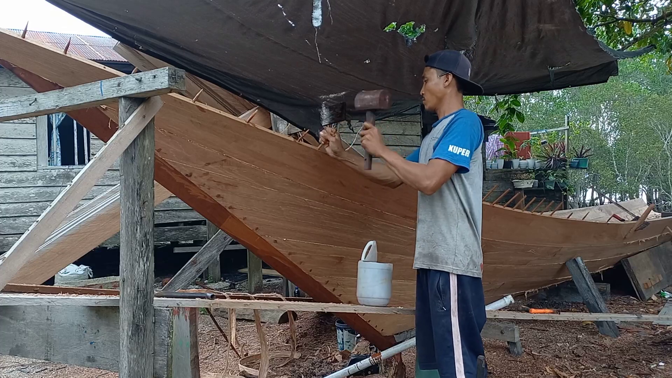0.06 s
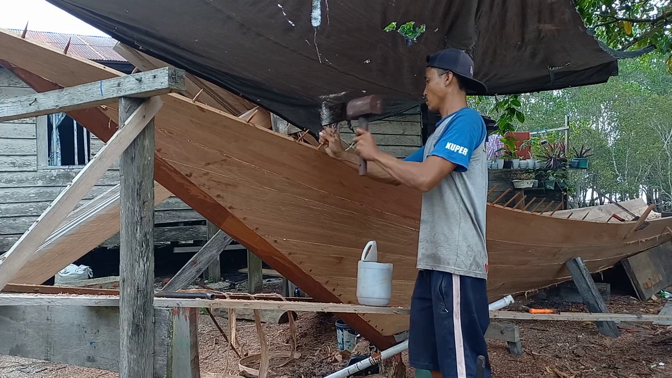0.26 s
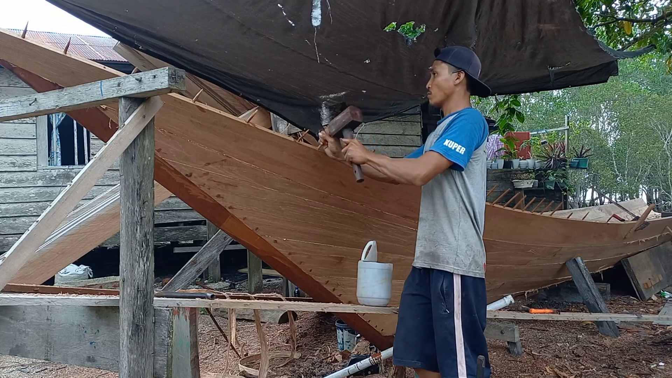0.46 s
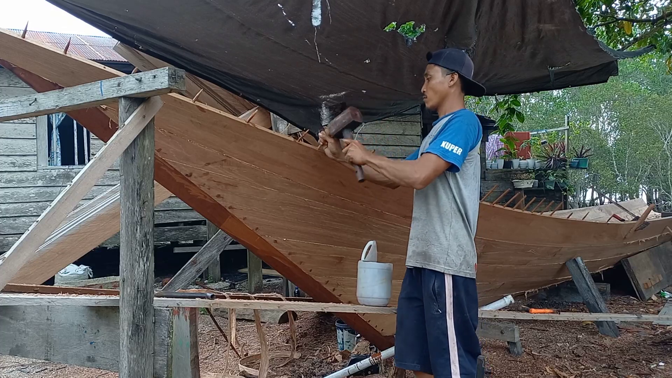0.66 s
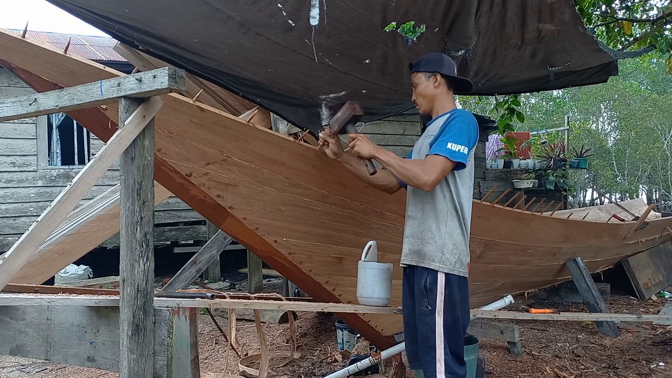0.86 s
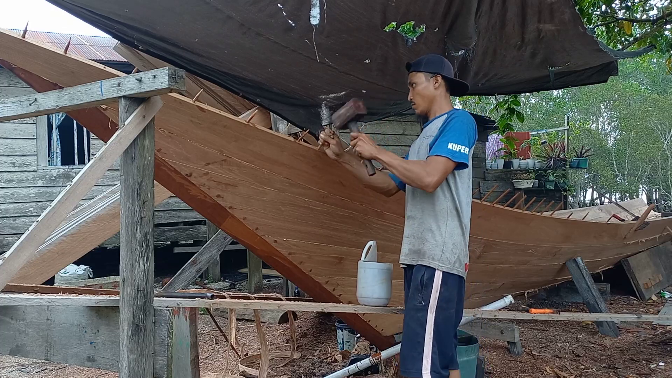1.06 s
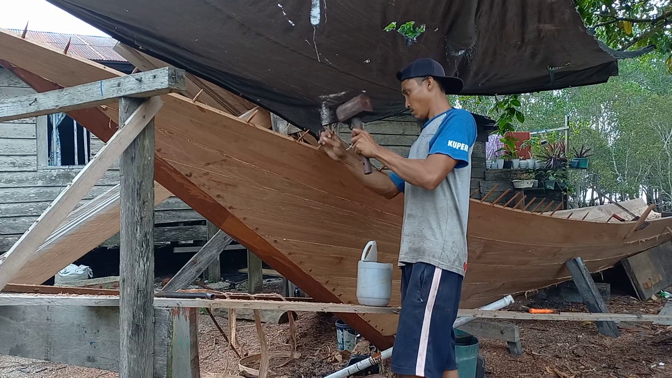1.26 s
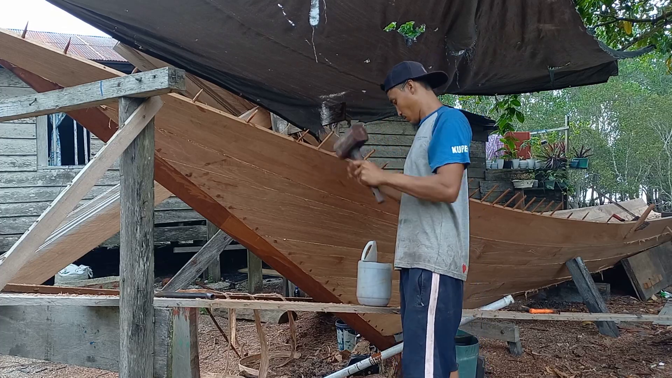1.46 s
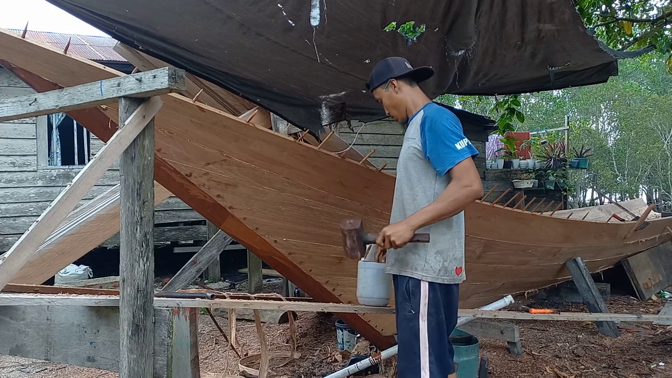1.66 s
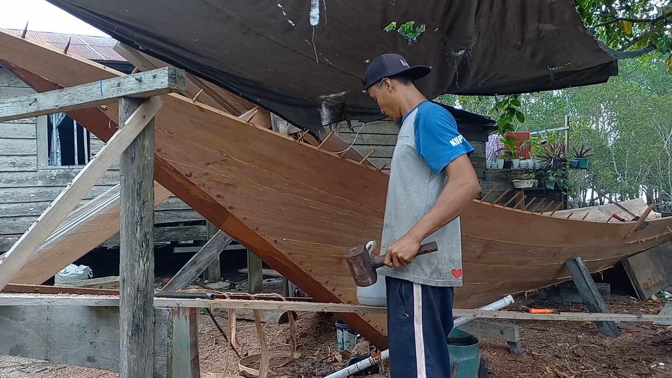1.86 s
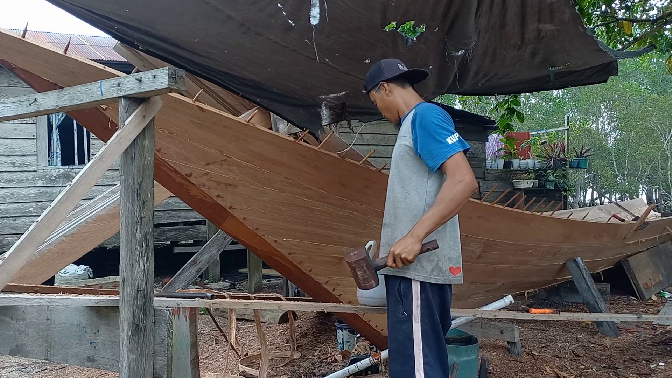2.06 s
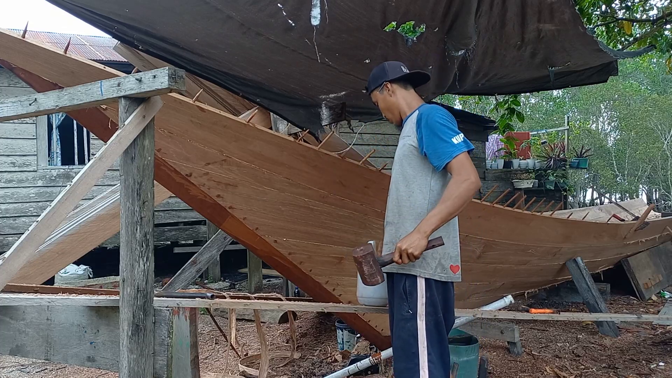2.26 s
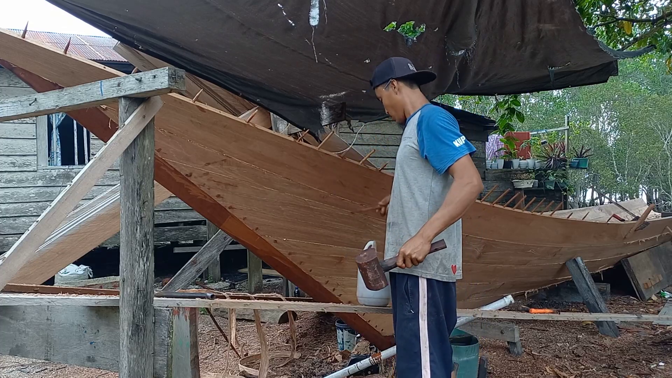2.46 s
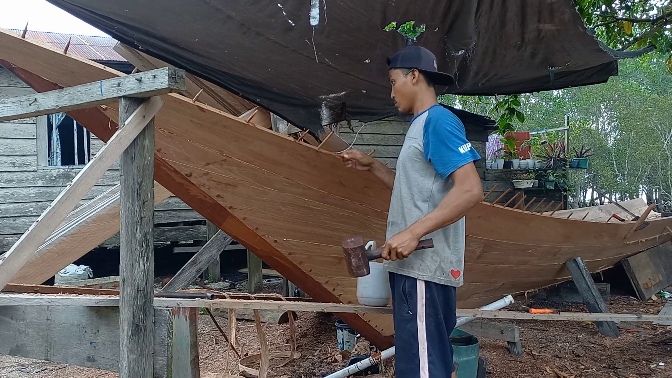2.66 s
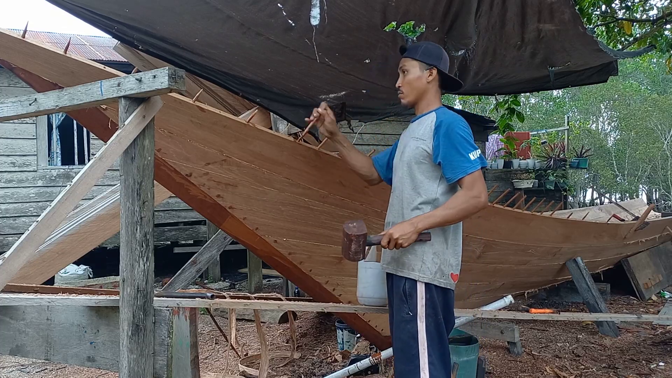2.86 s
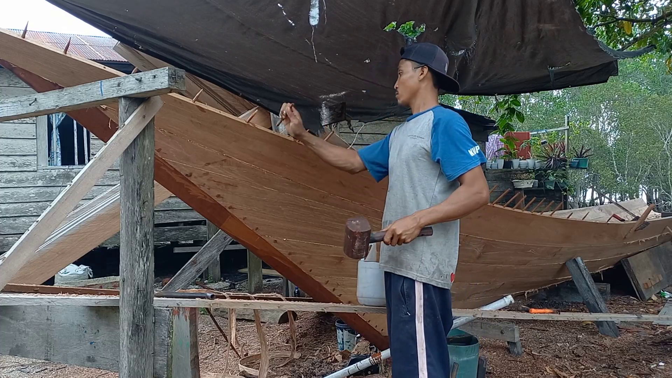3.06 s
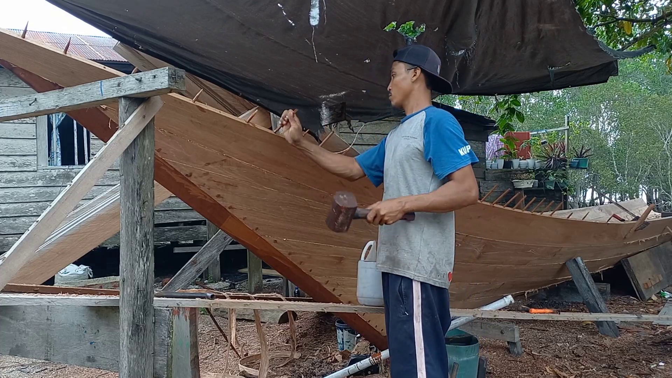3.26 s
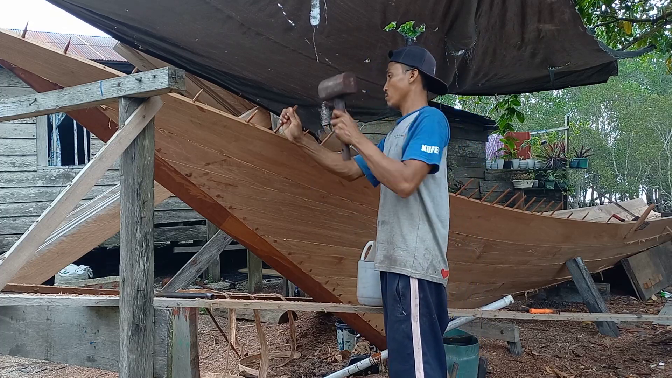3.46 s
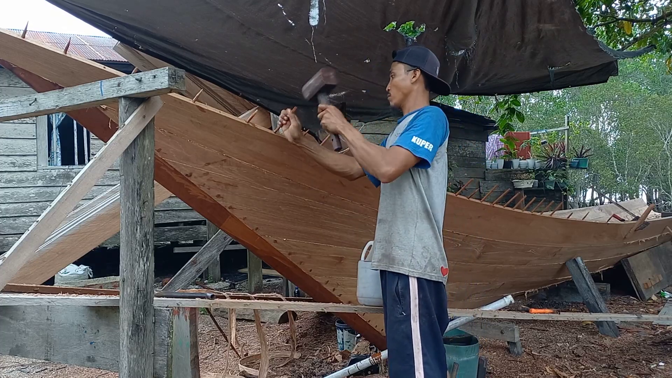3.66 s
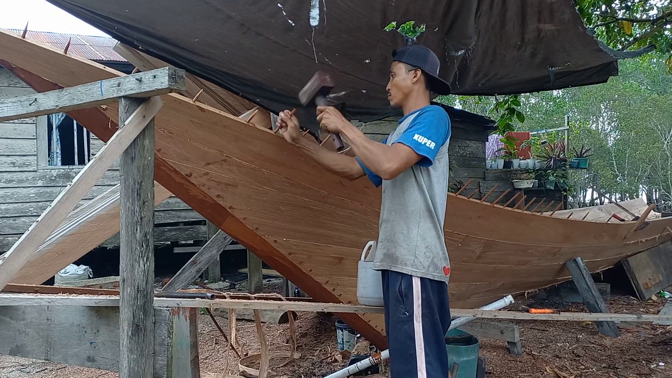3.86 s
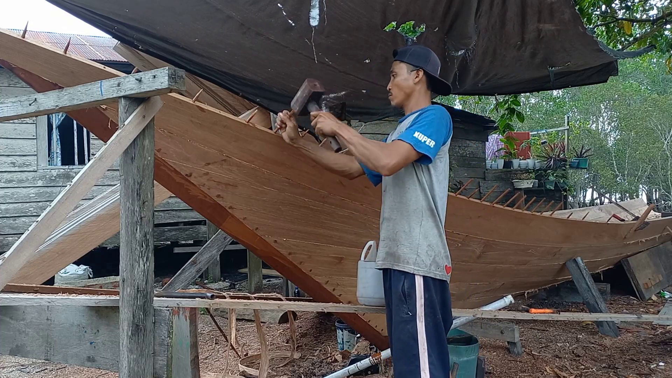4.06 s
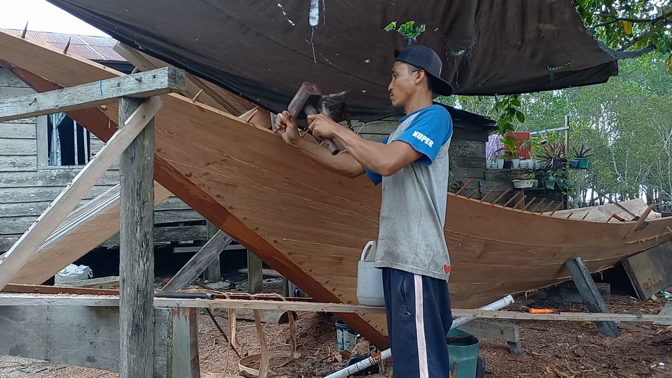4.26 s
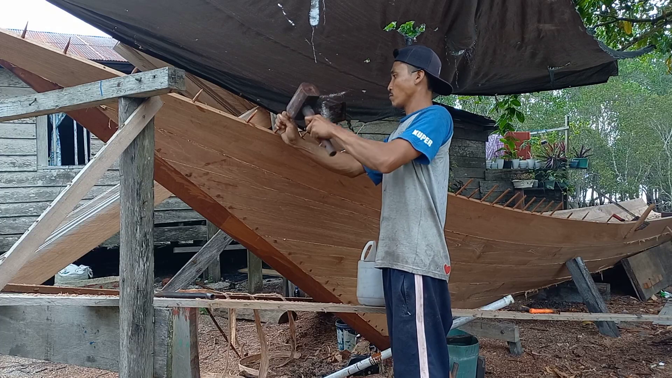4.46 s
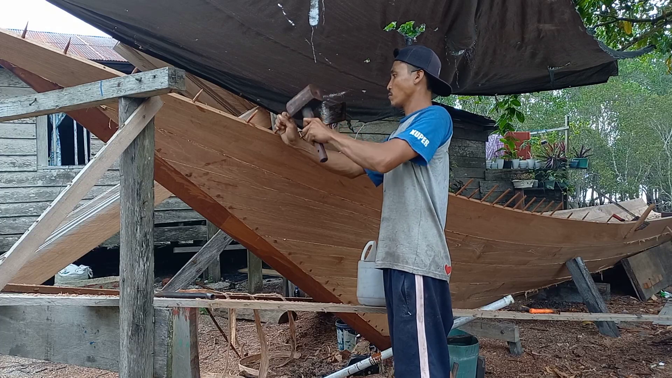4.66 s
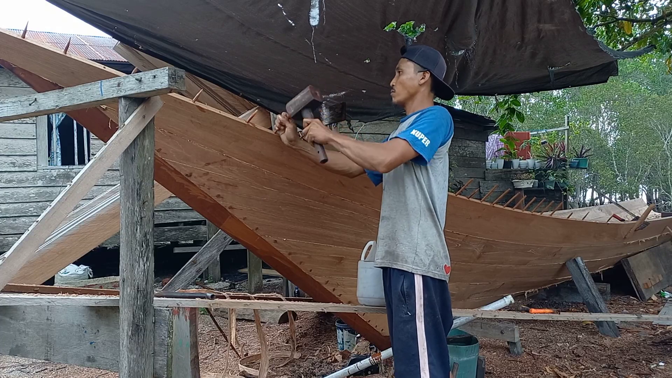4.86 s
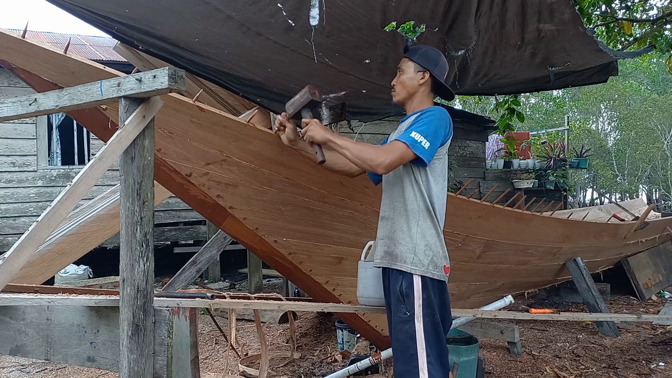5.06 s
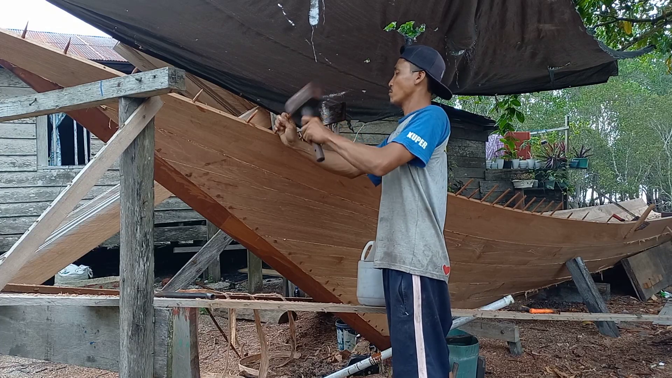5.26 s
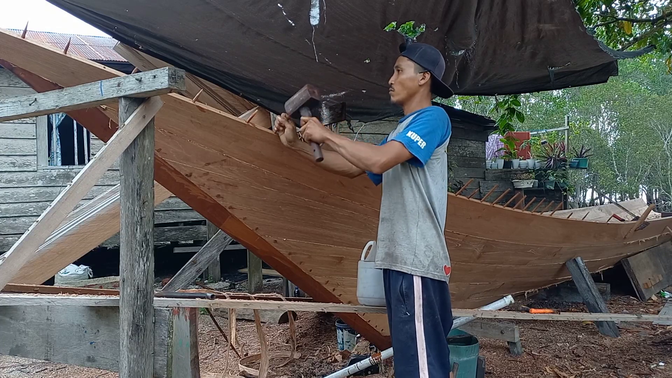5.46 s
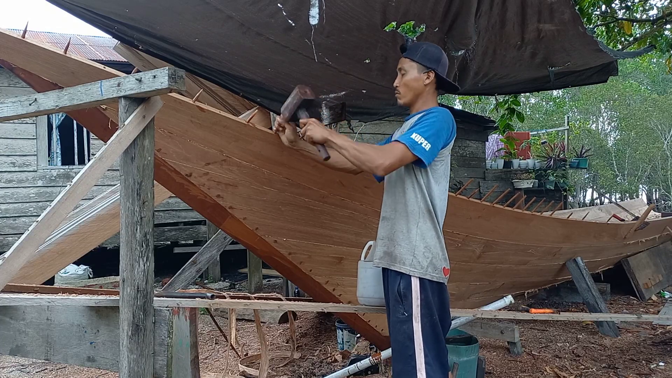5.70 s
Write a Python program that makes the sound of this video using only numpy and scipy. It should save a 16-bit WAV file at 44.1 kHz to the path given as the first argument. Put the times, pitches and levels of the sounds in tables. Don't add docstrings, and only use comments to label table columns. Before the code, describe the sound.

Quick, steady hammer blows crack and ring on hull planks, pause for rummaging and bird calls, then resume as a motorbike pulls off.

```python
import sys
import numpy as np
from scipy import signal
from scipy.fft import rfft, irfft
from scipy.io import wavfile
from scipy.ndimage import uniform_filter1d

SR = 44100
rng = np.random.default_rng(int(sys.argv[2]) if len(sys.argv) > 2 else 0)


def bounce(signal):
    frames = np.transpose(np.atleast_2d(signal))
    limited = np.clip(frames, -1, 1)
    pcm = np.round(limited * 32767).astype(np.int16)
    wavfile.write(sys.argv[1], SR, pcm)


def attenuation_scalar(level_db):
    decades = np.asarray(level_db, float) / 20
    return 10 ** decades


N = 252690


def curve(table):
    s, *columns = np.transpose(table)
    return [np.interp(np.arange(N) / SR, s, c) for c in columns]


def unit(x):
    return x / np.sqrt(np.mean(x ** 2))


def band(x, hz, octaves):
    edges = np.clip(hz * 2 ** (np.array([-octaves, octaves]) / 2), 10, .47 * SR)
    return signal.sosfilt(signal.butter(2, edges, "band", fs=SR, output="sos"), x)


def highpass(x, order, hz):
    return signal.sosfilt(signal.butter(order, hz, "high", fs=SR, output="sos"), x)


def walk(rate):
    k = int(SR / rate)
    steps = np.repeat(rng.standard_normal(N // k + 1), k)
    return unit(uniform_filter1d(uniform_filter1d(steps, k), k)[:N])


def pair(mid, side, alike):
    alike = np.clip(alike, 0, 1)
    shared = mid * np.sqrt((1 + alike) / 2)
    opposed = side * np.sqrt((1 - alike) / 2)
    return np.array([[1], [1]]) * shared + np.array([[1], [-1]]) * opposed


def noise_pair(n, alike):
    return pair(*rng.standard_normal((2, n)), alike)


def place(x, left_lead, pan_db):
    x = x * np.ones((2, 1))
    turn = np.exp(1j * np.pi * np.fft.rfftfreq(N) * left_lead * np.array([[1], [-1]]))
    return irfft(rfft(x) * turn, N) * attenuation_scalar(np.array([[pan_db], [-pan_db]]) / 2)


def add(out, s, sound):
    i = int(s * SR)
    out[..., i:i + sound.shape[-1]] += sound[..., :N - i]


def fade(t, t60):
    return np.exp(-np.log(1000) * t / t60)


# pitch_hz, level_db (per Hz)
YARD = [(30, -32.5), (80, -33.5), (105, -7), (200, 10), (400, -24), (700, -19), (1200, -41), (2200, -16.5),
        (3600, -28), (5500, -22), (8500, -26.5), (12000, -24), (13500, -26), (15500, -23.5)]
# start_s, end_s, level_db
INSECTS = [
    (0, 1.5, -63),
    (2.25, 2.6, -62.5),
    (2.85, 3.42, -60),
    (3.54, 5.73, -61.5),
]
YARD_DB, YARD_ALIKE_HZ = -53.5, 709
INSECT_REST_DB, INSECT_EDGE_S, CRICKETS_DB = -69, .12, -68
LULL_S, LULL_DB, LULL_EDGE_S = (1.72, 2.3), -3.5, .2


def yard():
    t = np.arange(N) / SR
    lull = 1. * ((t > LULL_S[0]) & (t < LULL_S[1]))
    lull_db = LULL_DB * uniform_filter1d(lull, int(LULL_EDGE_S * SR))
    yard_hz, yard_level_db = np.transpose(YARD)
    hum, swell = 0, walk(0.16)
    for hz in 30 * 2 ** np.arange(0, 9.2, 1 / 2):
        db = np.interp(np.log(hz), np.log(yard_hz), yard_level_db)
        db = db + lull_db * (hz > 900) + 0.14 * swell + 0.17 * walk(8)
        alike = 1 / (1 + (hz / YARD_ALIKE_HZ) ** 2) + 0.065
        hum = hum + attenuation_scalar(db) * band(noise_pair(N, alike), hz, 1 / 2)
    hiss = noise_pair(N, 0.068)
    bouts = sum((db - INSECT_REST_DB) * ((t >= start) & (t < end)) for start, end, db in INSECTS)
    swell_db = INSECT_REST_DB + uniform_filter1d(bouts, int(INSECT_EDGE_S * SR))
    insects = unit(band(band(hiss, 10200, .5), 10200, .5)) * attenuation_scalar(swell_db + 1.2 * walk(40))
    crickets = unit(band(band(hiss, 12300, 0.09), 12300, 0.09)) * attenuation_scalar(CRICKETS_DB)
    return place(attenuation_scalar(YARD_DB) * unit(hum) + insects + crickets, 11.3, -.6)


DULL_HZ = 350


def engine(hz, pipe, stretch, jitter, wobble_db, dull_db=0):
    turns = np.cumsum(hz * (1 + jitter * walk(30))) / SR
    note, power = 0, 0
    for k in range(2, 14):
        gain = 0
        for centre_hz, width_hz, db in pipe:
            detune = 2 * (k * hz / stretch - centre_hz) / width_hz
            gain = gain + attenuation_scalar(db) / (1 + detune ** 2) ** 2
        gain = gain * attenuation_scalar(dull_db * (k * hz > DULL_HZ))
        harmonic = np.sin(2 * np.pi * (k * turns + rng.random()))
        note = note + gain * attenuation_scalar(wobble_db * walk(26.015)) * harmonic
        power = power + gain ** 2 / 2
    return note / power ** 0.37, turns % 1


# time_s, firing_hz, level_db
BIKE = [(0, 57.3, -45.5), (1.2, 54.42, -55.5), (1.9, 49.98, -54.5), (2.3, 46.1, -49.5), (2.62, 35.1, -57),
        (2.88, 40.3, -45.5), (2.98, 49.13, -39.5), (3.19, 82.9, -36.5), (3.3, 94.2, -32),
        (3.42, 99.94, -38), (3.55, 90.1, -36), (3.63, 76.74, -45), (3.85, 48.04, -45), (4, 44.25, -48),
        (4.66, 59.42, -46.5), (5.1, 76.06, -39.5), (5.4, 88.75, -46.5), (5.73, 93.3, -43)]
# pitch_hz, width_hz, level_db
EXHAUST = [(190.6, 81, 1), (255.5, 59, -12), (378, 70, -19.5), (441, 72, -13), (680, 70, -28),
           (800, 80, -30), (990, 120, -31)]
RASP_DB, RASP_PER_NOTE, RASP_DB_PER_OCTAVE = -56.5, 0.6, 4.5
PIPE_STRETCH, PULL_S, HEAT_PER_S = 1.046, 4.08, 0.093
DULL_DB_PER_S = -6


def motorbike():
    hz, db = curve(BIKE)
    pulling_s = np.maximum(np.arange(N) / SR - PULL_S, 0)
    stretch = PIPE_STRETCH + HEAT_PER_S * pulling_s
    note, phase = engine(hz, EXHAUST, stretch, .009, 3.2, DULL_DB_PER_S * pulling_s)
    rasp_db = RASP_DB + RASP_PER_NOTE * (db + 45) + RASP_DB_PER_OCTAVE * np.log2(hz / 55)
    gas = noise_pair(N, 0.66) * (1.0 + np.exp(-phase / 0.59))
    return place(attenuation_scalar(db) * note + attenuation_scalar(rasp_db) * unit(band(gas, 345, 2.46)), 12.3, 0)


# time_s, firing_hz, level_db
IDLER = [
    (0, 50.14, -48.5),
    (2.0, 52.4, -58),
    (2.45, 55.1, -60),
    (2.7, 51.9, -70),
    (5.73, 52.3, -81),
]
# pitch_hz, width_hz, level_db
IDLER_PIPE = [(105, 40, -8), (260, 16, -3), (333, 122, 0.5), (376.5, 21, -2), (457, 67, -18)]


def far_engine():
    hz, db = curve(IDLER)
    note, _ = engine(hz, IDLER_PIPE, 0.96, 0.0019, 3.4)
    return place(attenuation_scalar(db) * note, 10.0, 0)


# start_s, crack_peak_db, plank_ring_db, slap_s (plank on its rib), slap_peak_db
BLOWS = [(0.092, -23, -26, .1084, -18.5), (0.2754, -21, -24.5, .2917, -17.5),
         (0.451, -20.5, -26.5, .4717, -17), (0.623, -20, -23.5, .6389, -15.5),
         (0.799, -20, -19.5, .8272, -20.5), (0.969, -19, -20, .9864, -16.5),
         (1.1422, -18, -21, 1.1603, -15.5), (1.3186, -17.5, -17, 1.3393, -16),
         (1.4836, -19.5, -15, 1.5201, -14), (3.7358, -29.5, -23, 3.7522, -36),
         (3.952, -25, -26, 3.9695, -27), (4.168, -22.5, -26, 4.1845, -22), (4.378, -22, -26, 4.394, -17.5),
         (4.5993, -21.5, -24.5, 4.6241, -22), (4.812, -21.5, -23.5, 4.8397, -18.5),
         (5.0193, -20, -26.5, 5.045, -18), (5.2273, -21, -22, 5.2528, -14.5),
         (5.429, -22, -24, 5.4552, -15), (5.6353, -20.5, -22.5, 5.6606, -16)]
FIRST_PEG = 9
HAMMER_LEAD = 2.3
TREBLE_DB, DULLING_DB = (-10, -7.5), (1.36, 1.5)
LATE_RING_DB, LATE_RING_PER_SLAP = (-4.5, -3.5), 0.62
THUMP_DB, THUMP_PER_RING = (-30, -32), 0.22


def peg_of(k):
    return int(k >= FIRST_PEG)


def colour(k):
    s, crack_db, plank_db, slap_s, slap_db = BLOWS[k]
    peg = peg_of(k)
    treble_db = crack_db + TREBLE_DB[peg] - DULLING_DB[peg] * (k - peg * FIRST_PEG)
    late_ring_db = LATE_RING_DB[peg] + LATE_RING_PER_SLAP * (slap_db - plank_db)
    thump_db = THUMP_DB[peg] + THUMP_PER_RING * (plank_db + 34.5)
    return treble_db, late_ring_db, thump_db


# pitch_hz, crack_db, crack_t60_s, ring_db, rise_s, hold_s, ring_t60_s,
# left_right_likeness (0-1)
HULL = [(142.5, -19.5, 0.034, -14, 0.0038, 0.022, 0.24, 0.99),
        (230.3, -21, 0.063, -12, 0.0022, 0.04, 0.39, 0.97), (551, -7, 0.006, -13, 0.008, 0.031, 0.19, 0.9),
        (900, -12, 0.014, -9, 0.014, 0.019, 0.15, 0.53), (1700, -12, 0.12, -16, 0.006, 0.007, 0.12, 0.4),
        (2935, -15.5, 0.091, -20, 0.004, 0.0098, 0.27, 0),
        (4700, -3.5, 0.011, -21, 0.0066, 0.034, 0.16, 0.1),
        (6570, 2, 0.033, -19.5, 0.00084, 0.024, 0.35, 0.26),
        (11400, -6, 0.065, -11.5, 0.00082, 0.04, 0.22, 0),
        (13600, 12.5, 0.0051, -30, 0.0022, 0.02, 0.16, 0.6)]
# ring_time (share of the usual), sparkle_db, thump_db
LANDING = [(0.95, -7, 0.5), (0.9, -6.5, -1), (1.02, -3.5, -2), (0.93, -2.5, -2.5), (0.83, -2, 2),
           (0.94, 0.5, 0), (0.93, 1.5, 0), (0.91, 2, 0), (0.85, 3.5, .5), (0.78, -11, 2), (1.13, -1.5, 1.5),
           (0.98, -5, -1), (0.99, -4, -1.5), (0.99, -2, 4), (0.82, 2, 0.5), (1.03, 5, -2.5), (0.9, 8, -2.5),
           (1.03, 8.5, -4.5), (.97, 9, 3)]
# low_body_db, upper_body_db, steel_click_db (over the crack), wall_echo_db
TONE = [(1.5, -1, 5, -1), (0, 0, 6, -1), (0.5, 0, 5, -1), (0, 0, 3, -1), (-0.5, 0.5, 6, 0), (-1, 0, 4, 0),
        (0, 0, 7, -1), (-0.5, 0.5, 8, -1), (-1.5, 0, 2.5, 0), (1.5, -0.5, 0.5, -3), (0, -1, -1, -1),
        (-1, -0.5, 3, 0.5), (-1.5, -0.5, 1.5, 1), (-1, -1, -0.5, 2), (-2, -0.5, -3, 2), (1, -0.5, 1.5, 0.5),
        (-1, -0.5, -1, 1), (0, -0.5, 4, 2.5), (-1, 0.5, 5, 2.5)]
SPLASH_DB = [0, 0.3, -0.8, -0.1, 3, -0.3, -1, -.6, 1.5, -10, 0.7, 0.5, -0.5, 2.5, 0.8, -0.5, 1, 0.5, 0]
SPIKE = (0.95, 0.38)
TOP_RING_DB = (6, -1.5)
LATE_RING_TOP_HZ = 8000
PATCH_DB, PATCH_S, TREBLE_PATCH = 4.3, .005, .75
WALL_S, WALL_DB, WALL_HZ, WALL_T60_S, WALL_TOP_DB = .0685, -18.5, 5200, .008, (-15, -15)
SHELTER_DB, SHELTER_HZ, SHELTER_T60_S = -24.5, 1040, 0.44
YARD_ECHO_DB, YARD_ECHO_T60_S = (-25.5, -21), 0.44


def hull():
    t, out = np.arange(SR // 3) / SR, np.zeros((2, N))
    slapback = (t > WALL_S) * fade(np.abs(t - WALL_S), WALL_T60_S)
    for hz, crack_db, crack_t60, ring_db, rise, hold, t60, alike in HULL:
        dry, peg_grain = np.zeros((2, N)), rng.standard_normal((2, 2, len(t)))
        patches = rng.standard_normal((len(BLOWS) + 2, int(t[-1] / PATCH_S) + 2))
        wall = attenuation_scalar(WALL_DB) / (1 + np.log2(hz / WALL_HZ) ** (4 if hz < WALL_HZ else 2)) * slapback
        roof = (1 - fade(t, 0.12)) * fade(t, SHELTER_T60_S)
        roof = attenuation_scalar(SHELTER_DB) / (1 + np.log2(hz / SHELTER_HZ) ** 4) * roof
        far = (1 - fade(t, .2)) * fade(t, YARD_ECHO_T60_S)
        far = far / (1 + (np.log2(hz / 4000) / .45) ** 4)
        for k, (s, crack_peak_db, plank_db, *_) in enumerate(BLOWS):
            peg, (treble_db, late_db, thump_db) = peg_of(k), colour(k)
            ring_time, sparkle_db, landing_thump_db = LANDING[k]
            low_db, upper_db, _, echo_db = TONE[k]
            crack = attenuation_scalar(crack_db) * (fade(t, crack_t60) + SPIKE[peg] * fade(t, 0.0059))
            free = ring_time if hz < 2500 else 1
            level_db = ring_db + SPLASH_DB[k] * (hz > 1500) + TOP_RING_DB[peg] * (hz > 13000)
            ring = (1 - np.exp(-t / rise)) * fade(np.maximum(t - hold * free, 0), t60 * free)
            patch = .7 * patches[-1 - peg] + .7 * patches[k]
            patch_db = PATCH_DB * (TREBLE_PATCH if hz > 2500 else 1)
            patch_db = patch_db * np.interp(t / PATCH_S, np.arange(len(patch)), patch)
            swell_db = min(late_db, 0) if hz > LATE_RING_TOP_HZ else late_db
            ring = attenuation_scalar(level_db) * ring * attenuation_scalar(swell_db + patch_db)
            wall_echo = wall + (hz > 9000) * attenuation_scalar(WALL_TOP_DB[peg]) * slapback
            wall_echo = attenuation_scalar(late_db + echo_db) * wall_echo
            blow_db = np.interp(np.log(hz), np.log([250, 500, 1000, 3500, 9000, 13000]),
                                [thump_db + 6 + landing_thump_db, plank_db + low_db, plank_db + upper_db / 2,
                                 crack_peak_db + upper_db, treble_db + 1.5, treble_db + sparkle_db])
            shape = crack + ring + wall_echo + roof + attenuation_scalar(YARD_ECHO_DB[peg]) * far
            grain = 0.7 * peg_grain[peg] + 0.55 * rng.standard_normal((2, len(t)))
            add(dry, s, attenuation_scalar(blow_db) * shape * pair(*grain, alike))
        shade = attenuation_scalar(-2.5 * (hz / 13000) ** 4 * np.array([[1], [-1]]))
        octaves = 0.6 if 9000 < hz < 13000 else 0.84
        out += shade * band(dry, hz, octaves) * np.sqrt(SR / 2 / (0.82 * hz))
    return place(out, HAMMER_LEAD, 0.19)


PEG_SCATTER_DB, PEG_DRIFT = 2, .03
# pitch_hz, level_db, t60_s
STEEL = [(4300, -7, .004), (6500, -0.5, .005), (9300, -5, .004), (14300, -4, .003)]


def steel():
    t, out = np.arange(SR // 50) / SR, np.zeros(N)
    hz, db, t60 = np.transpose(STEEL)[:, :, None]
    for (s, crack_db, *_), (_, _, click_db, _) in zip(BLOWS, TONE):
        drift = 1 + PEG_DRIFT * rng.standard_normal((len(hz), 1))
        modes = attenuation_scalar(crack_db + click_db - 6 + db) * np.sin(2 * np.pi * hz * drift * t) * fade(t, t60)
        add(out, s + .0004, modes.sum(0))
    return place(out, HAMMER_LEAD, -1.5)


# pitch_hz, level_db (under the crack), t60_s
PEG_1 = [(900, -22, 0.026), (1294, -4, 0.038), (1700, -12, 0.048), (2574, -0.5, 0.034), (3618, -18, 0.056)]
PEG_2 = [(797, -15, 0.029), (1470, -13.5, 0.035), (1763, -7, 0.066), (2864, -2.5, 0.027),
         (3646, -12.5, 0.046), (4235, -14, 0.025)]


def pegs():
    t, out = np.arange(SR // 3) / SR, np.zeros(N)
    for k, (s, crack_db, *_) in enumerate(BLOWS):
        hz, db, t60 = np.transpose((PEG_1, PEG_2)[peg_of(k)])[:, :, None]
        chance = rng.standard_normal((2, len(hz), 1))
        tone = np.sin(2 * np.pi * hz * (1 + PEG_DRIFT * chance[1]) * t)
        level = attenuation_scalar(crack_db + TONE[k][1] + db + PEG_SCATTER_DB * chance[0])
        add(out, s + 0.001507, (level * tone * (1 - fade(t, 0.028)) * fade(t, t60)).sum(0))
    return place(out, HAMMER_LEAD, -0.36)


# pitch_hz, level_db, t60_s
PLANK_1 = [(219.5, -4, 0.33), (411.4, -5, 0.4), (387, -3, 0.33), (602.7, -1, 0.35), (742, 2.5, 0.098),
           (795, 1.5, 0.17), (981, -3.5, 0.15), (647, 7, 0.12), (1620, -5, 0.072), (515, -4, 0.15),
           (1946, -3, 0.07), (2410, -6.5, 0.08), (1252, -3, 0.1), (1397, -9, 0.18)]
PLANK_2 = [(215, -3.5, 0.17), (274.8, -3, 0.64), (410, -4, 0.2), (548.5, 6, 0.11), (604.6, 7.5, 0.11),
           (679, -2.5, 0.22), (348, 0.5, 0.16), (835, -1, 0.1), (1040, -15, 0.11), (1151, 0, 0.1),
           (1235, -5, 0.11), (1365, -1, 0.12), (1760, -4, 0.064), (2040, 0, 0.062)]
REBOUND_DB, REBOUND_RISE_S = (-8.5, -7), 0.003
REBOUND_LEAD_S = (0.00197, .012)
MODE_DRIFT = .006


def planks():
    t, out = np.arange(SR // 3) / SR, np.zeros(N)
    for k, (blow_s, _, plank_db, slap_s, _) in enumerate(BLOWS):
        peg = peg_of(k)
        hz, db, t60 = np.transpose((PLANK_1, PLANK_2)[peg])[:, :, None]
        low_db, upper_db, *_ = TONE[k]
        swell_db = plank_db + colour(k)[1] + REBOUND_DB[peg]
        strike = (blow_s, plank_db - 16, .001)
        rebound = (slap_s - REBOUND_LEAD_S[peg], swell_db, REBOUND_RISE_S)
        for s, peak_db, rise in (strike, rebound):
            chance = rng.standard_normal((2, len(hz), 1))
            tone = np.sin(2 * np.pi * hz * (1 + MODE_DRIFT * chance[1]) * t)
            decay = fade(t, LANDING[k][0] * np.minimum(.8 * t60, .25))
            level = attenuation_scalar(db + 2.5 * chance[0] + np.where(hz < 900, low_db, upper_db))
            add(out, s, attenuation_scalar(peak_db) * (level * tone * decay * (1 - np.exp(-t / rise))).sum(0))
    return place(out, HAMMER_LEAD, -0.36)


# start_s, peak_db
RATTLES = [(0.1162, -20.5), (0.6421, -23), (1.3426, -21), (1.4861, -12), (1.4848, -19), (1.3537, -22),
           (.305, -22), (.2995, -23), (1.4893, -26), (1.5025, -21), (3.9905, -28.5), (4.0022, -35),
           (4.6365, -35), (5.035, -23), (5.2463, -26), (5.2638, -23)]


def slaps():
    x, out = (np.arange(SR // 3) / SR - .0015) / .0003, np.zeros(N)
    push = (1 - x ** 2) * np.exp(-x ** 2 / 2)
    for k, (s, _, plank_db, slap_s, slap_db) in enumerate(BLOWS):
        add(out, s + 0.0012, -attenuation_scalar(plank_db) * push)
        add(out, slap_s - .0015, attenuation_scalar(slap_db + 1.5) * push * (1, -.6)[peg_of(k)])
    for s, db in RATTLES:
        add(out, s - .0015, attenuation_scalar(db) * push)
    return place(out, HAMMER_LEAD, -0.36)


WIND_DB, GUST_DB, JOLT_DB, JOLT_T60_S = -90, 3, -34, .2
REV_S, REV_GUST_DB, REV_GUST_S = 3.32, -73, .2


def wind():
    t, jolts = np.arange(SR // 2) / SR, np.zeros(N)
    for k, blow in enumerate(BLOWS):
        add(jolts, blow[0], attenuation_scalar(colour(k)[2] + LANDING[k][2] + JOLT_DB) * fade(t, JOLT_T60_S))
    puff = attenuation_scalar(REV_GUST_DB) * np.exp(-((np.arange(N) / SR - REV_S) / REV_GUST_S) ** 2)
    level = attenuation_scalar(WIND_DB + GUST_DB * walk(2.4)) + jolts + puff
    return unit(band(noise_pair(N, 0.55), 52, 1.7)) * level


# level_db, then a pitch line of time_s, pitch_hz
WHISTLES = [
    (-58.5, [(1.783, 5350), (1.815, 5220), (1.83, 4900), (1.858, 4800)]),
    (-59, [(1.885, 3960), (1.904, 3680), (1.926, 3603), (1.945, 3940)]),
    (-55.5, [(1.95, 3650), (1.986, 3830), (2.02, 3420), (2.076, 3666), (2.12, 3690)]),
    (-54.5, [(2.234, 3650), (2.25, 3764), (2.265, 3900)]),
    (-65, [(2.282, 3800), (2.304, 3600), (2.325, 3800)]),
    (-53.5, [(2.665, 3340), (2.718, 3640), (2.74, 3780), (2.755, 3680)]),
    (-55.5, [(2.76, 3820), (2.774, 3637), (2.79, 3710), (2.805, 3670)]),
]
# start_s, start_hz, end_hz, length_s, level_db
CHIRPS = [(0.941, 3430, 4070, 0.02, -56), (1.072, 3260, 3600, 0.017, -53.5),
          (1.219, 3050, 3550, 0.0185, -50.5), (1.735, 11300, 9400, .025, -59),
          (1.748, 7900, 7100, .032, -70), (1.762, 6860, 5740, 0.047, -63), (1.856, 4560, 4000, 0.032, -72),
          (1.85, 3500, 3520, .028, -72), (0.655, 3550, 3830, 0.03, -53), (1.807, 3600, 3530, 0.022, -65),
          (2.809, 3530, 3640, 0.013, -61), (2.831, 3720, 3700, 0.008, -57), (2.853, 3750, 3470, 0.038, -68),
          (2.885, 3730, 3694, 0.012, -65), (2.902, 3630, 3490, 0.049, -66), (3.897, 5323, 5060, 0.027, -57),
          (3.914, 7500, 7700, .018, -60), (3.928, 6600, 6000, 0.019, -57), (4.688, 5400, 5140, .02, -60),
          (4.714, 4975, 4600, 0.029, -56)]
WHISTLE_ATTACK, WHISTLE_RELEASE, WHISTLE_EDGE_DB = 0.4, 0.21, -6.5
TREES_DB = -42.5


def birds():
    dry = np.zeros(N)
    for level_db, note in WHISTLES:
        hz, = curve(note)
        a, b = int(note[0][0] * SR), int(note[-1][0] * SR)
        edge_db = np.interp((np.arange(N) - a) / (b - a), [0, WHISTLE_ATTACK, 1 - WHISTLE_RELEASE, 1],
                            [WHISTLE_EDGE_DB, 0, 0, WHISTLE_EDGE_DB])
        level = np.sqrt(2) * attenuation_scalar(level_db + edge_db + 2.4 * walk(71))
        dry[a:b] += (level * np.sin(2 * np.pi * np.cumsum(hz) / SR))[a:b]
    for s, start_hz, end_hz, length, db in CHIRPS:
        n = int(length * SR)
        tone = np.sin(2 * np.pi * np.cumsum(np.linspace(start_hz, end_hz, n)) / SR)
        add(dry, s, 2 * attenuation_scalar(db) * np.hanning(n) * tone)
    t = np.arange(SR // 3) / SR
    trees = unit(rng.standard_normal((2, len(t)))) * fade(t, 0.62) * attenuation_scalar(TREES_DB)
    return place(dry, -11.5, 3.2) + signal.fftconvolve(dry[None], trees, axes=1)[:, :N]


# start_s, peak_db, pitch_hz, t60_s,
# tick_db
KNOCKS = [(1.4842, -13, 680, .014, -30), (1.5205, -22, 1300, .06, -20), (2.075, -53, 780, 0.36, -15),
          (2.11, -52, 940, 0.087, -16), (2.4934, -44.5, 2250, 0.032, 7.5), (2.493, -42, 900, 0.07, 0.5),
          (2.349, -56, 5600, 0.01, -8), (2.449, -57, 7400, .012, -14), (3.4135, -42, 5200, .02, -3),
          (3.629, -41, 5700, .1, -20), (3.4133, -37, 1700, 0.06, 2.5), (3.624, -37.5, 1356, 0.1, -8),
          (3.646, -40, 1340, .06, -12), (3.667, -46, 1300, .06, -20), (3.632, -44, 2600, .08, -10),
          (3.63, -45, 2050, .08, -20), (3.636, -47, 3250, .06, -20), (3.69, -48, 1400, .05, -20),
          (2.342, -50, 3300, .02, -10), (2.379, -52, 2500, .02, -10), (2.399, -52, 2600, .02, -10),
          (2.296, -52, 2500, .05, -8), (2.497, -50, 4500, .02, -10), (3.627, -32, 522, 0.079, -21),
          (3.804, -47, 500, 0.093, -20), (4.012, -34, 1980, 0.08, -1.5), (4.022, -35, 1420, 0.13, -6),
          (4.706, -41, 1290, 0.17, 2)]
# start_s, peak_db, pitch_hz, tick_db
RUMMAGE = [(2.224, -56, 980, 0.5), (2.287, -46, 900, -2), (2.294, -46, 800, -1), (2.301, -45, 800, 1.5),
           (2.311, -47, 750, 1.5), (2.329, -44, 1050, -3), (2.341, -38, 1050, -3), (2.359, -47, 1100, 0.5),
           (2.378, -43, 1050, -3), (2.398, -50, 1100, 1.5), (2.414, -55, 1100, 0.5),
           (2.455, -56, 1100, 1.5), (2.532, -50, 900, 1.5)]
RUMMAGE_T60_S = .03
KNOCK_TONE = .3


def knocks():
    t, out = np.arange(SR // 5) / SR, np.zeros((2, N))
    rummage = [(s, db, hz, RUMMAGE_T60_S, tick_db) for s, db, hz, tick_db in RUMMAGE]
    for s, db, hz, t60, tick_db in list(KNOCKS) + rummage:
        grain = noise_pair(len(t), 0.88) * fade(t, t60)
        body = band(grain, hz, .5)
        tick = band(grain * (.6 + fade(t, .015)), 2500, 2.1)
        knock = (1 - KNOCK_TONE / 2) * body / np.abs(body).max()
        knock = knock + KNOCK_TONE * np.sin(2 * np.pi * hz * t) * fade(t, t60)
        knock = knock + attenuation_scalar(tick_db) * tick / np.abs(tick).max()
        add(out, s, attenuation_scalar(db) * knock)
    return place(out, 2.8, 0)


# start_s, length_s, level_db, pitch_hz
SCUFFS = [
    (2.285, .11, -63, 1500),
    (3.622, .025, -57, 2400),
    (4.01, .035, -50, 2000),
    (4.342, .025, -49, 1500),
    (4.692, .03, -54, 1900),
]
SCUFF_ATTACK_S, SCUFF_T60_S, SCUFF_GRAIN_DB = .004, .1, 2.5


def scuffs():
    t, out = np.arange(SR // 3) / SR, np.zeros((2, N))
    for s, length, db, hz in SCUFFS:
        shape = (1 - np.exp(-t / SCUFF_ATTACK_S)) * fade(np.maximum(t - length, 0), SCUFF_T60_S)
        steps = np.repeat(rng.standard_normal(len(t) // 128 + 1), 128)[:len(t)]
        grains = attenuation_scalar(SCUFF_GRAIN_DB * steps)
        add(out, s, attenuation_scalar(db) * shape * unit(band(noise_pair(len(t), 0.8) * grains, hz, 1.23)))
    return place(out, 3.0, 0)


def scene():
    boat = highpass(hull() + pegs() + planks() + slaps(), 4, 125)
    return yard() + motorbike() + far_engine() + boat + steel() + birds() + knocks() + scuffs()


def low_pass(x):
    return signal.sosfilt(signal.butter(12, 16660, fs=SR, output="sos"), x)


# pitch_hz, width_hz, level_db
MIC = [(3900, 800, 6), (6600, 1500, 3), (14800, 1500, 3)]


def record(dry):
    for hz, width_hz, db in MIC:
        dry = dry + (attenuation_scalar(db) - 1) * signal.lfilter(*signal.iirpeak(hz, hz / width_hz, SR), dry)
    windy = highpass(dry, 5, 120) + wind()
    mix = signal.sosfilt(signal.ellip(8, .3, 35, 15600, fs=SR, output="sos"), windy)
    return low_pass(mix)


dry = scene()
out = record(dry)
bounce(out)
```